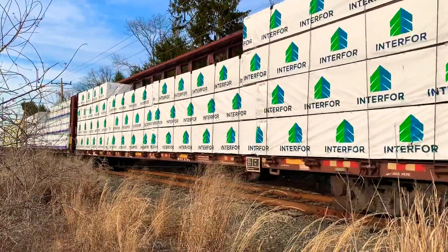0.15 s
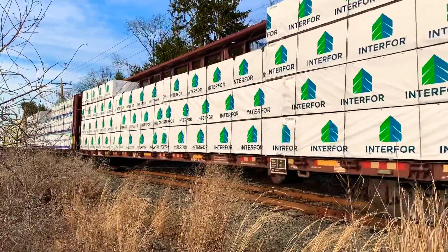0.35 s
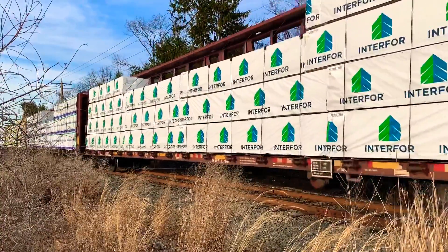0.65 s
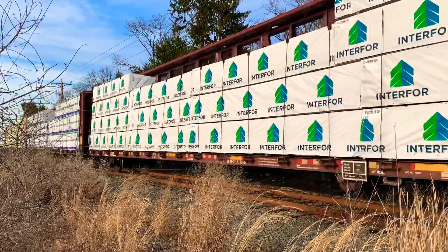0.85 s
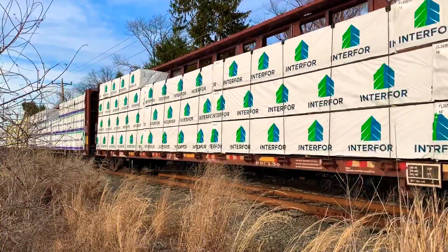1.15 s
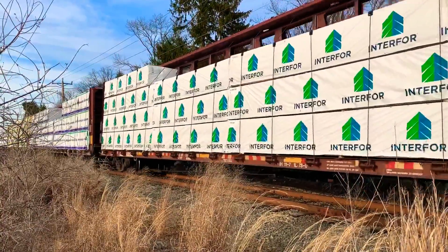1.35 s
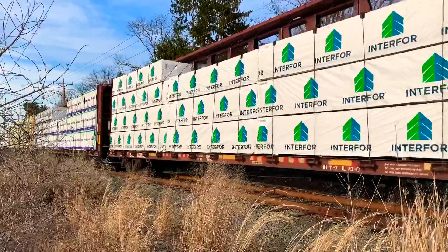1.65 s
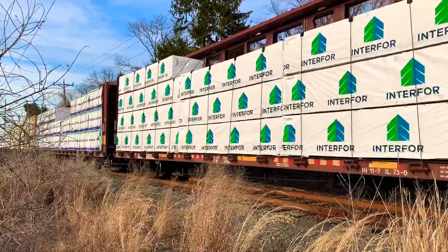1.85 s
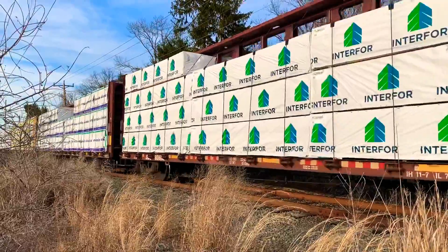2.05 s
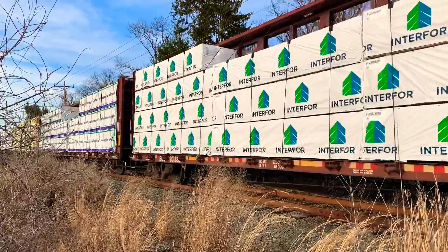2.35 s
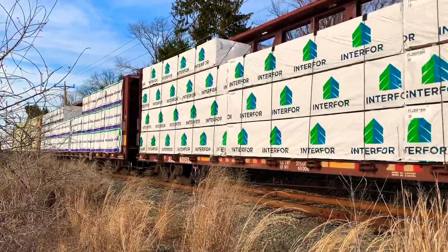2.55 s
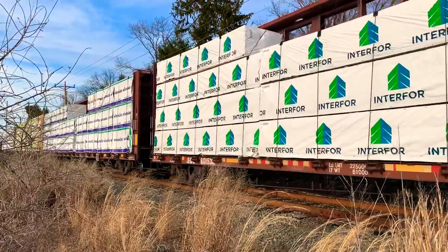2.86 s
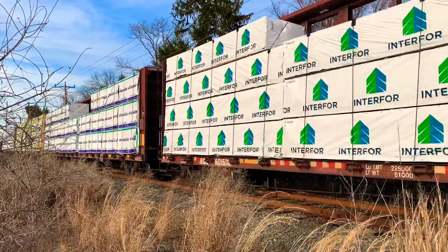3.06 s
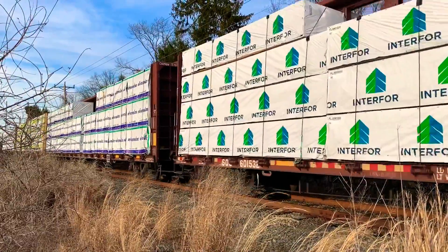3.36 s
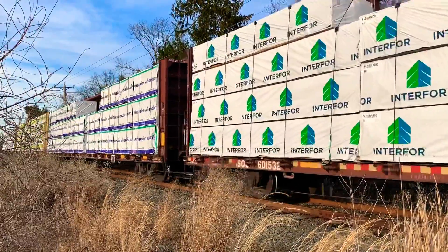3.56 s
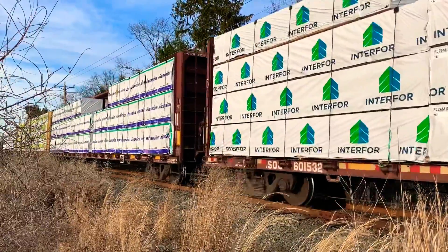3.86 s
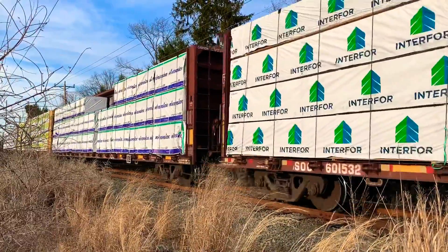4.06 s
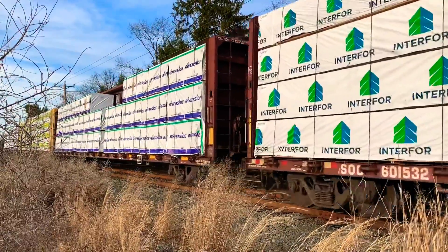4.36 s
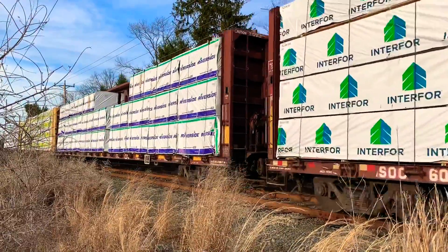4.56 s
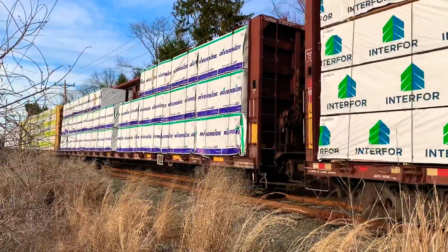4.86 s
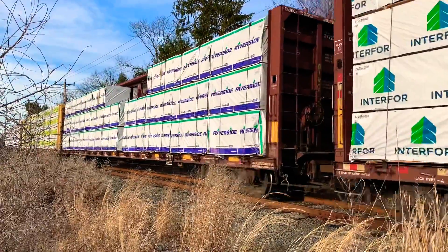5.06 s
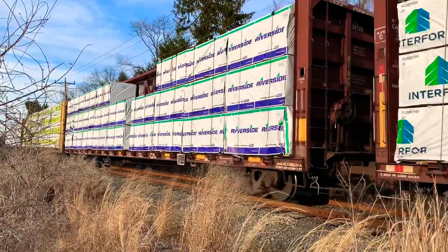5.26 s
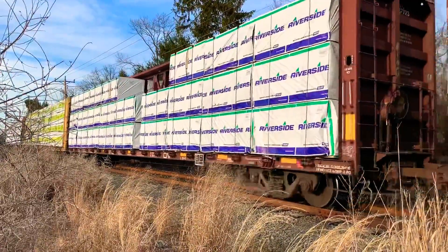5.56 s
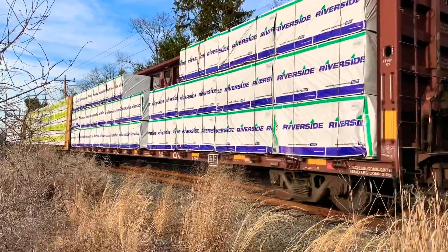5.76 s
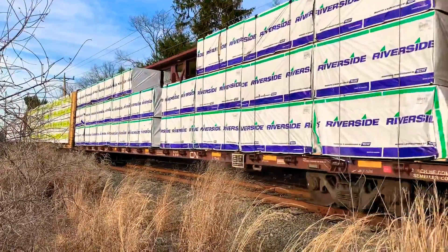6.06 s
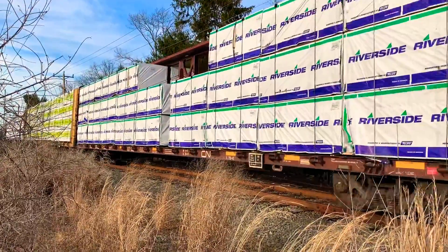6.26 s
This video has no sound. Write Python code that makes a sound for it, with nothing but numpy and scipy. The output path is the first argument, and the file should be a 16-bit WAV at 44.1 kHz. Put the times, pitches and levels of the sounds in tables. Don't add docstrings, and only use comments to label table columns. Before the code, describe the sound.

Heavy wheels clank and thud over jointed track outdoors, with short piercing squeaks, loose metal rattling and a low rolling rumble.

```python
import sys
import numpy as np
from scipy import signal
from scipy.fft import rfft, irfft
from scipy.io import wavfile
from scipy.ndimage import uniform_filter1d

SR = 44100
rng = np.random.default_rng(int(sys.argv[2]) if len(sys.argv) > 2 else 0)


def nominal_scale(level):
    x = np.asarray(level, float) / 20
    return 10 ** x


def to_wav(s):
    ch = np.atleast_2d(s).T
    pcm = np.round(np.clip(ch, -1, 1) * 32767)
    wavfile.write(sys.argv[1], SR, pcm.astype(np.int16))


N = 282678

# pitch_hz, density_db [dB per Hz]
BANG_COLOUR = [(60, -36), (150, -2), (600, -9.5), (1000, -9.5), (1500, -10), (2250, -17.5), (2900, -25.5),
               (5500, -27.5), (7000, -15.5), (12000, -18.5), (13500, -17), (16000, -20.5)]
BANG_SPLITS_HZ = [600, 1700, 4700]
# pitch_hz, left_lead [rad]
PORT_PHASE = [(300, -.35), (620, -1.3), (1800, -3.14), (2400, -5.2), (4300, -6.3), (5000, -8.4), (5500, -9),
              (6050, -7), (6900, -6.5), (7600, -8.1), (8270, -9.3), (8960, -9.6), (9650, -11),
              (10350, -12.4), (11050, -12.6), (12400, -14.5), (12800, -15.6), (13900, -15.75),
              (14500, -16.9), (15150, -18.4), (15800, -19)]
# pitch_hz, share [0-1]
PORT_LIKENESS = [(60, .99), (330, .85), (950, .7), (1400, .85), (2300, .8), (3000, .2), (4800, .25),
                 (5500, .65), (6500, .4), (7600, .75), (8300, .97), (8900, .97), (9650, .7), (10600, .985),
                 (11100, .99), (12400, .7), (12900, .98), (13900, .98), (14500, .55), (15200, .95)]


def rms_one(x):
    return x / np.sqrt(np.mean(x ** 2) + 1e-20)


def at_hz(points, hz):
    table_hz, values = np.transpose(points)
    return np.interp(np.log(hz + 1), np.log(table_hz + 1), values)


def over_time(points):
    return np.interp(np.arange(N) / SR, *np.transpose(points))


def drift(rate):
    r = np.exp(-80 * np.pi * rate / SR)
    slow = signal.lfilter([1], [1, -2 * r, r * r], rng.standard_normal(N // 40 + 2002))[2000:]
    return np.interp(np.arange(N) / 40, np.arange(len(slow)), rms_one(slow))


def swells(rows):
    t = np.arange(N) / SR
    return sum(db * np.exp(-.5 * ((t - s) / length) ** 2) for s, db, length in rows)


def add(out, s, sound):
    i = int(s * SR)
    out[..., i:i + sound.shape[-1]] += sound[..., :N - i]


def noise_zones(spectrum, splits_hz, count, patchy_db):
    hz = np.fft.rfftfreq(N, 1 / SR)
    coloured = rfft(rng.standard_normal((2, N))) * nominal_scale(at_hz(spectrum, hz))
    centres = np.geomspace(30, 15000, count)
    zones = np.zeros((len(splits_hz) + 1, 2, N))
    together = drift(6.7)
    for k, centre in enumerate(centres):
        window = np.interp(np.log(hz + 1), np.log(centres), np.arange(count) == k)
        flicker = nominal_scale(patchy_db * (2 + centre / 12000) * (0.62 * together + drift(19.4)))
        zones[np.searchsorted(splits_hz, centre)] += flicker * irfft(coloured * window, N)
    return [rms_one(z) for z in zones]


def narrow(hz, width_hz, n):
    r = np.exp(-np.pi * max(width_hz, 1) / SR)
    draw = rng.standard_normal((2, 2, n + 4000))
    slow = signal.lfilter([1], [1, -2 * r, r * r], draw[0] + 1j * draw[1])[:, 4000:]
    slow = slow / np.abs(slow) ** .5
    return rms_one(np.real(slow * np.exp(2j * np.pi * hz * np.arange(n) / SR)))


def in_step(hz, turn, s):
    # start_s, share
    aside_share = [
        (2.7, .8),
        (3.1, .25),
    ]
    half = np.interp(hz, *np.transpose(PORT_PHASE)) / 2
    alike = np.clip(at_hz(PORT_LIKENESS, hz), 0, .9)
    aside = np.interp(s, *np.transpose(aside_share))
    common = (np.cos(half) - aside * np.sin(half)) * np.sin(turn) / np.sqrt(1 + alike)
    apart = -(np.sin(half) + aside * np.cos(half)) * np.cos(turn) / np.sqrt(1 - alike)
    return np.sqrt(2) * np.array([common, apart])


def rattle(low_drive, high_drive, per_s, spread_db, cycles, count=26):
    mode_range_hz = 600, 5347
    sizes = nominal_scale(spread_db * np.minimum(rng.exponential(1, (2, N)), 4))
    sizes = sizes * (rng.random((2, N)) < per_s / SR)
    dealt = rng.integers(0, count, (2, N))
    pitches = np.geomspace(*mode_range_hz, count) * np.exp(0.026 * rng.standard_normal(count))
    out = 0
    for k, hz in enumerate(pitches):
        r = nominal_scale(-60 * hz / (cycles * SR))
        w = 2 * np.pi * hz / SR
        drive = low_drive if hz < BANG_SPLITS_HZ[1] else high_drive
        hits = sizes * (dealt == k) * drive
        ring = signal.lfilter([0, np.sin(w)], [1, -2 * r * np.cos(w), r * r], hits + 1e-18)
        out = out + nominal_scale(at_hz(BANG_COLOUR, hz)) * ring
    return out


def joints():
    # start_s, crunch_db [peak], then thud_db, clang_db, sizzle_db [dB over the crunch]
    joint_hits = [(0.052, -11.5, 1, -2.5, -9), (0.284, -17, 8.5, 0, -4), (0.771, -9.5, 5.5, 1.5, -8),
                  (1.182, -16, 4, 2, -19), (1.213, -14.5, 6.5, -4, -9), (1.22, -19.5, 0, 2, -4),
                  (1.625, -16, 9, -4, -27), (2.109, -9.5, 2.5, 3.5, -11), (2.552, -10, 1, 2, -3),
                  (2.798, -30, 13, 14.5, -7), (3.215, -11.5, 2.5, -2, -9.5), (3.661, -16, -1, -2.5, -7.5),
                  (4.028, -18.5, -13, 12, 5), (4.139, -15, -13, -0.5, -24), (4.160, -14, 5, 8, 3.5),
                  (4.208, -28, 11, 15, 10), (4.242, -24, -18, 9, 0), (4.608, -12, 2.5, -1, -4),
                  (4.633, -34, 3, 15, -10), (4.766, -15.5, -13, 0, -2), (5.149, -16.5, 6.5, -6, -35),
                  (5.210, -17, -18, -7, -23), (5.705, -4.5, -2, -3, -10.5), (6.152, -10, -5, -4, -9.5)]
    t60_s = 0.16 * np.array([[1.0], [1], [.8], [0.75]])
    tail_db, tail_longer = -12, 3.0
    crack_db, crack_s = 2, .006
    t = np.arange(SR // 2) / SR
    shapes = np.zeros((4, N))
    for s, db, thud_db, clang_db, sizzle_db in joint_hits:
        burst = nominal_scale(-60 * (t / t60_s) ** 1.37)
        fall = burst + nominal_scale(tail_db - 60 * t / (t60_s * tail_longer))
        fall[3] *= 1 + nominal_scale(crack_db) * np.exp(-t / crack_s)
        levels = nominal_scale(db - 8.5 + np.array([[thud_db], [0], [clang_db], [sizzle_db]]))
        rise_s = 0.003 * nominal_scale(-0.8 * (db + 9.5))
        add(shapes, s - 0.003 / 2, levels * np.minimum(t / rise_s, 1) * fall)
    zones = noise_zones(BANG_COLOUR, BANG_SPLITS_HZ, count=16, patchy_db=.3)
    grain = nominal_scale(2.0 * drift(230))
    bangs = grain * sum(shape * z for shape, z in zip(shapes, zones))
    return bangs + nominal_scale(-5) * rattle(shapes[1], shapes[2], per_s=2500, spread_db=2.5, cycles=50)


def knocks():
    # start_s, peak_db, pitch_hz
    struck_parts = [(.054, -13.5, 935), (.056, -19, 1604), (.057, -23, 2900), (.073, -21, 930),
                    (.135, -28, 2250), (.268, -31, 2400), (.293, -16, 1030), (.855, -28, 1260),
                    (3.662, -22, 1005), (4.203, -20, 2300), (5.248, -21.5, 1470), (5.168, -25, 3423),
                    (.772, -19, 2000), (.786, -13.5, 2420), (.790, -16, 1384), (1.167, -25, 1580),
                    (1.216, -11, 2070), (1.224, -16, 2450), (1.243, -19, 1350), (2.112, -17, 2400),
                    (2.113, -12.5, 600), (2.117, -13, 2180), (2.392, -23, 2220), (2.553, -10.5, 2030),
                    (2.554, -24, 2410), (2.560, -20, 1100), (3.218, -16, 836), (3.222, -24, 3860),
                    (3.232, -18, 1020), (3.661, -17, 826), (4.032, -13.5, 1755), (4.032, -20, 2250),
                    (4.035, -15, 3580), (4.033, -18, 4640), (4.034, -17, 6750), (4.140, -18, 870),
                    (4.161, -18, 1030), (4.178, -13, 1060), (4.255, -15, 2250), (4.254, -24, 3500),
                    (4.609, -9.5, 773), (4.611, -13.5, 1366), (4.633, -15, 1600), (4.633, -14, 1990),
                    (4.632, -19, 3875), (4.769, -17.5, 1600), (4.773, -23, 3100), (4.776, -11.5, 775),
                    (5.223, -13.5, 873), (5.706, -14, 1571), (5.706, -7, 945), (5.708, -12, 2250),
                    (5.724, -15, 1660), (6.154, -19, 755), (6.156, -14, 1105), (5.148, -13, 481),
                    (3.219, -23, 6850), (2.121, -14, 2210)]
    t60_s, rise_s = .055, .0007
    t, out = np.arange(SR // 8) / SR, np.zeros((2, N))
    phases = rng.uniform(0, 2 * np.pi, len(struck_parts))
    for (s, db, hz), phase in zip(struck_parts, phases):
        fall = nominal_scale(db - 0.5 - 60 * t / t60_s * (hz / 1000) ** 0.25)
        tone = in_step(hz, 2 * np.pi * hz * t + phase, s)
        add(out, s, np.minimum(t / rise_s, 1) * fall * tone)
    return out


def squeaks():
    # start_s, peak_db, pitch_hz, t60_s, width_hz
    flange_slips = [(0.0674, 0.5, 11550, 0.11, 370), (2.5546, -14.5, 10100, 0.19, 794),
                    (4.1795, 2, 11600, 0.042, 383), (4.6265, -7, 10870, 0.14, 450),
                    (6.169, -0.5, 11500, 0.094, 380), (0.030, -36, 10980, 0.2, 150),
                    (6.121, -18.5, 11070, 0.3, 152), (3.4844, -10, 7620, 0.06, 199),
                    (5.0384, -23, 7100, 0.071, 200), (5.717, -11, 6730, 0.22, 917),
                    (4.7655, -4, 15100, 0.04, 600), (4.766, -11.5, 10800, 0.047, 1500),
                    (4.3, -21.0, 3600, 0.038, 1500)]
    # offset [share of its width], level_db
    beating_modes = [(-0.74, -3), (-.3, 1.5), (-0.084, 1.5), (0.22, -1), (0.85, -9)]
    rise_s, bite_db, bite_s = 0.0054, 4, 0.0067
    tail_db, tail_longer, rough_db = -12, 4, -6
    t, out = np.arange(SR // 2) / SR, np.zeros((2, N))
    for s, db, hz, t60, width_hz in flange_slips:
        modes = rms_one(sum(nominal_scale(line_db) * narrow(hz + offset * width_hz, 0.072 * width_hz, len(t))
                            for offset, line_db in beating_modes))
        rough = nominal_scale(rough_db) * narrow(hz, width_hz, len(t))
        shriek = nominal_scale(-60 * t / t60) * (modes + rough)
        ring = nominal_scale(tail_db - 60 * t / (t60 * tail_longer)) * modes
        attack = np.minimum(t / rise_s, 1) * (1 + nominal_scale(bite_db) * np.exp(-t / bite_s))
        add(out, s, nominal_scale(db - 12.5) * attack * (shriek + ring))
    return out


def groans():
    # pitch_hz, second_partial_db, third_partial_db, scrape_db [dB over the tone]
    frames = [
        (400, -30, -34, -41),
        (280, -37, -33, -16.5),
    ]
    # start_s, level_db
    slip_levels = [
        [(.4, -44), (.428, -11.5), (.456, -20.5), (.482, -13.5), (.506, -15), (.52, -29), (.555, -18),
         (.592, -18.5), (.625, -34)],
        [(3.795, -44), (3.822, -9), (3.85, -10), (3.88, -6), (3.91, -6.5), (3.946, -9), (3.985, -14),
         (4.0, -35)],
    ]
    pitch_waver = .008, .003
    # excess [share], settle_s
    pitch_settle = [
        (.015, 0.026),
        (.05, 0.026),
    ]
    t, out = np.arange(N) / SR, np.zeros((2, N))
    band = signal.butter(1, [1200, 7500], "band", fs=SR, output="sos")
    hiss = signal.sosfilt(band, rng.standard_normal((2, N)))
    hiss = nominal_scale(1.2 * drift(29)) * rms_one(through_bodies(hiss))
    for frame, rows, waver, (high, settle_s) in zip(frames, slip_levels, pitch_waver, pitch_settle):
        hz, second_db, third_db, scrape_db = frame
        s, db = np.transpose(rows)
        droop = high * np.exp(-np.maximum(t - s[1], 0) / settle_s)
        turn = 2 * np.pi * np.cumsum(hz * (1 + waver * drift(36.5) + droop)) / SR
        for k, partial_db in enumerate([0, second_db, third_db]):
            unsteady_db = (.7 + 2 * k) * drift(30)
            level = nominal_scale(np.interp(t, s, db, -120, -120) + partial_db + unsteady_db)
            out += np.sqrt(2) * level * in_step((k + 1) * hz, (k + 1) * turn, s[0])
        scrape = nominal_scale(np.interp(t - 0.01, s, db, -120, -120) + scrape_db)
        out += scrape * (1 + 0.13 * np.sin(turn)) * hiss
    return out


def rubs():
    # start_s, level_db, pitch_hz, length_s
    smooth_rubs = [(.001, -22.5, 1990, .022), (1.219, -20, 3400, .035), (1.302, -22, 3390, .05),
                   (1.25, -36, 3390, .15), (.92, -36, 2280, .07), (1.545, -27, 2800, .05),
                   (1.927, -15, 99.8, .26), (2.125, -25, 3360, .11), (2.126, -30, 2180, .2),
                   (2.34, -30, 2004, .06), (2.3, -33, 3370, .09), (2.58, -28, 3300, .042),
                   (2.6, -32, 3350, .087), (3.255, -33, 3760, .025), (3.658, -14.5, 329, .061),
                   (4.05, -7.5, 59.3, .14), (4.158, -10, 2300, .024), (4.33, -29, 3400, .07),
                   (4.76, -29, 985, .07), (3.7, -30, 2200, .03), (5.21, -30, 1060, .08),
                   (.92, -34, 2450, .05), (5.447, -28, 679, .2), (5.811, -27, 2320, .067),
                   (5.898, -27, 2360, .026), (4.86, -27, 1310, .05), (5.245, -33, 2900, .04),
                   (4.88, -31, 2080, .06)]
    # start_s, level_db, pitch_hz, length_s
    rough_chafes = [(.791, -23, 3340, 0.07), (2.33, -27.5, 2250, 0.26), (4.195, -19, 2200, 0.11),
                    (1.5, -32, 2200, .5), (1.28, -35, 2000, 0.12), (4.4, -27.5, 2800, .16),
                    (5.15, -26, 2100, 0.054), (3.3, -37, 1600, 0.4)]
    out = np.zeros((2, N))
    for rows, width in ((smooth_rubs, 0.016), (rough_chafes, 0.12)):
        for s, db, hz, length in rows:
            along = np.linspace(0, 1, int(length * SR))
            tone = narrow(hz, width * hz * np.sqrt(hz / 2000), len(along))
            add(out, s, nominal_scale(db) * along ** .3 * (1 - along) ** .9 * tone)
    return out


def hums():
    # start_s, level_db, pitch_hz, length_s
    held_tones = [(4.615, -33, 975, 0.163), (4.915, -23.5, 946, 0.088), (4.872, -20, 875, 0.035),
                  (5.6, -28, 472, .075), (.43, -34, 1191, 0.12), (.57, -41, 1200, .06),
                  (5.45, -31, 680, .06), (.482, -26, 800, 0.044), (3.882, -26, 842, 0.039),
                  (.795, -34, 2310, 0.092), (1.058, -40, 2100, .09)]
    edge_s, sag = .012, .006
    out = np.zeros((2, N))
    for s, db, hz, length in held_tones:
        t = np.arange(int(length * SR)) / SR
        edges = np.clip(np.minimum(t, length - t) / edge_s, 0, 1)
        turn = 2 * np.pi * hz * t * (1 + sag * (1 - t / length) / 2)
        add(out, s, np.sqrt(2) * nominal_scale(db) * edges * in_step(hz, turn, s))
    return nominal_scale(2.5 * drift(25)) * out


def rolling():
    # start_s, level_db
    nearness = [(0.0, -28.5), (1.19, -31), (1.41, -32.5), (1.68, -34.5), (2.11, -38.5), (2.53, -37),
                (2.86, -40), (3.05, -39), (3.68, -35), (3.84, -26.5), (4.09, -31), (4.27, -45.5),
                (4.53, -35.5), (4.8, -30), (5.12, -32), (5.32, -32.5), (5.86, -31.5), (6.41, -31.5)]
    layer_splits_hz = [150, 700, 4700]
    # pitch_hz, density_db [dB per Hz]
    roar_colour = [(22, -39), (40, -6.5), (58, -3), (110, -5.5), (160, -8), (200, -5), (420, -11.5),
                   (560, -22.5), (1000, -42), (1800, -33.5), (2300, -44.5), (2900, -47.5), (12500, -53.5),
                   (15400, -50.5)]
    layers = [
        (-21, 0.31, 0.39, 0.038),
        (-24, 0.79, 0.37, 0.43),
        (-32, 0.9, 0.2, 1.21),
        (-44, 2.15, 0.079, 1.56),
    ]
    # centre_s, height_db
    axle_heaves = [(.13, 2.5), (.43, 8.5), (.78, 2), (1.23, -1), (1.55, -8), (1.74, 9), (1.9, 6),
                   (2.05, 14.5), (2.36, 9.5), (2.58, 8), (2.77, 5.5), (3.38, 12), (3.72, 7), (4.11, -4),
                   (4.47, 5), (4.64, 11), (4.9, 4.5), (5.22, 6), (5.5, 1), (5.8, 10), (6.0, 6), (6.27, 9.5)]
    # centre_s, height_db, length_s
    flange_drags = [(.43, 6, 0.035), (.75, 5, 0.014), (1.1, 2.5, 0.055), (1.62, 4, 0.13), (1.87, 4, 0.025),
                    (2.44, 6, 0.09), (2.84, 5, 0.085), (3.33, 5, 0.085), (3.72, 5, 0.023),
                    (4.01, 3.5, 0.014), (4.12, 4, 0.027), (4.23, 12, 0.056), (4.45, 4, 0.043),
                    (4.92, 6, 0.12), (5.26, 2.5, 0.066), (5.66, 3.5, 0.07), (5.87, 3.5, 0.062),
                    (6.22, 5.5, 0.062)]
    near_db = over_time(nearness)
    near_db = near_db - near_db.mean()
    heave_db = swells([(s, db, 0.061) for s, db in axle_heaves])
    drag_db = swells(flange_drags)
    gains = [nominal_scale(db + near * near_db + heave * heave_db + drag * drag_db) for db, near, heave, drag in layers]
    zones = noise_zones(roar_colour, layer_splits_hz, count=26, patchy_db=1.2)
    shake = gains[2] * nominal_scale(2.5 * drift(7))
    loose_parts = nominal_scale(-3) * rattle(shake, shake, per_s=900, spread_db=3.0, cycles=140)
    return sum(g * z for g, z in zip(gains, zones)) + loose_parts


def singing():
    # pitch_hz, width_hz, level_db
    sung_modes = [(60.2, 6, -31), (194.2, 12.4, -32.5), (684, 100, -44.5), (860, 130, -41), (1190, 46, -79),
                  (2140, 180, -46.5), (2300, 150, -55.5), (2270, 31, -71), (3370, 750, -51.5),
                  (4330, 27, -71)]
    white, out = rng.standard_normal((2, N)), 0
    for hz, width_hz, db in sung_modes:
        r = np.exp(-np.pi * width_hz / SR)
        mode = signal.lfilter([1, 0, -1], [1, -2 * r * np.cos(2 * np.pi * hz / SR), r * r], white)
        out = out + nominal_scale(db + 3.5 * drift(5.55)) * rms_one(mode)
    return out


def through_bodies(x):
    spacing_hz, ripple_db, from_hz = 45, 3.2, 450
    hz = np.fft.rfftfreq(N, 1 / SR)
    grid = np.arange(0, SR / 2, spacing_hz)
    draw = np.clip(rng.standard_normal(len(grid)), -1.6, 1.6)
    draw = draw - uniform_filter1d(draw, size=5)
    ripple = np.interp(hz, grid, draw) * np.clip(hz / from_hz - 1, 0, 1)
    cepstrum = irfft(np.log(nominal_scale(ripple_db * ripple - 1)), N)
    cepstrum = cepstrum * np.where(np.arange(N) < N // 2, 2, 0)
    cepstrum[0] /= 2
    return irfft(rfft(x) * np.exp(rfft(cepstrum)), N)


def scene():
    noisy = through_bodies(joints() + rolling())
    return noisy + knocks() + squeaks() + groans() + rubs() + hums() + singing()


def low_pass(x):
    return signal.sosfilt(signal.butter(12, 17120, fs=SR, output="sos"), x)


def record(dry):
    # pitch_hz, left_minus_right_db
    port_balance = [(110, 0), (200, -4), (380, -1.5), (1290, 0), (3000, 0), (5000, -5), (6500, -6),
                    (7200, 0), (15000, 0)]
    # start_s, sideways_db
    sideways_level = [(0, -0.5), (1.3, 2), (2.7, 0), (3.1, -2.5), (4.3, -3.5), (6.41, -2.5)]
    sideways_band_hz = 350, 600, 2000, 3200
    overload = 1.5
    hz = np.fft.rfftfreq(N, 1 / SR)
    common, apart = rfft(dry)
    alike = np.clip(at_hz(PORT_LIKENESS, hz), 0, 1)
    side = np.array([[1], [-1]])
    ports = np.sqrt((1 + alike) / 2) * common + side * np.sqrt((1 - alike) / 2) * apart
    lead = np.interp(hz, *np.transpose(PORT_PHASE))
    tilt = nominal_scale(.5 * side * at_hz(port_balance, hz))
    ports = irfft(ports * np.exp(.5j * side * lead) * tilt, N)
    difference = rfft(ports[0] - ports[1]) / 2
    sideways = irfft(difference * np.interp(hz, sideways_band_hz, [0, 1, 1, 0]), N)
    ports = ports + side * sideways * (nominal_scale(over_time(sideways_level)) - 1)
    ports = overload * np.tanh(ports / overload)
    dip = signal.butter(2, [12900, 14900], "stop", fs=SR, output="sos")
    ports = signal.sosfilt(dip, ports) * 0.5 + ports * 0.33
    ports = signal.sosfilt(signal.cheby2(10, 50, 16050, fs=SR, output="sos"), ports)
    return low_pass(np.clip(ports, -1, 1))


dry = scene()
out = record(dry)
to_wav(out)
```